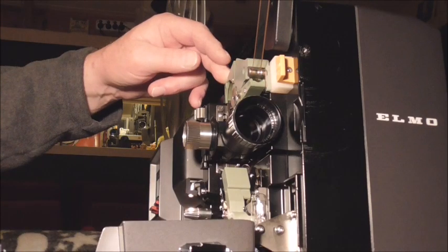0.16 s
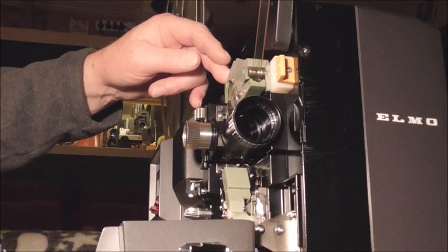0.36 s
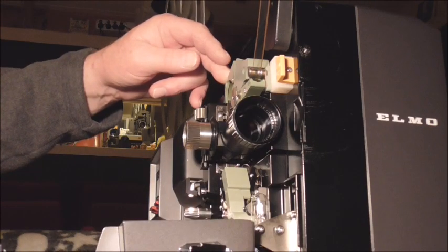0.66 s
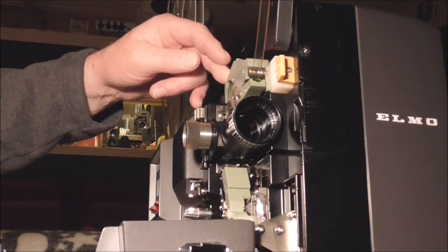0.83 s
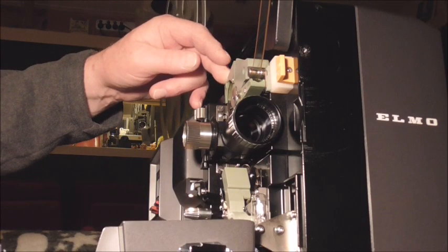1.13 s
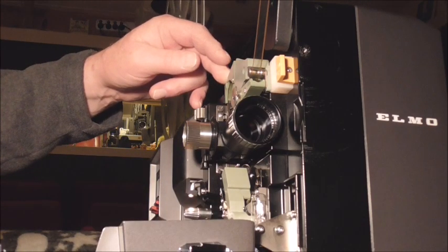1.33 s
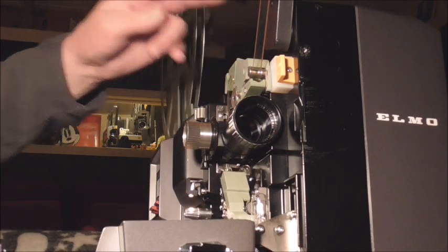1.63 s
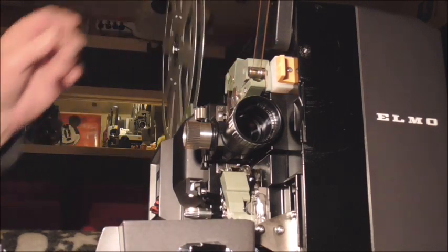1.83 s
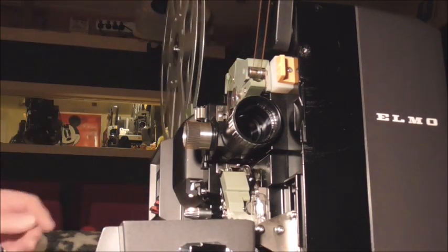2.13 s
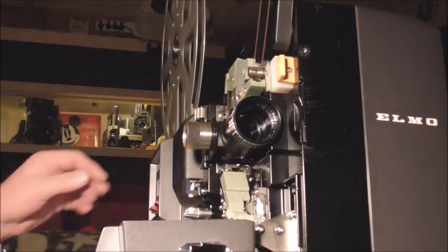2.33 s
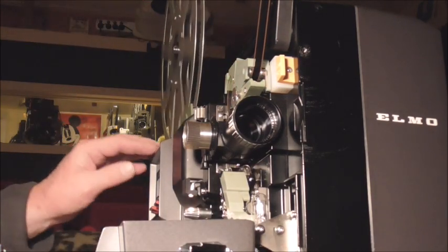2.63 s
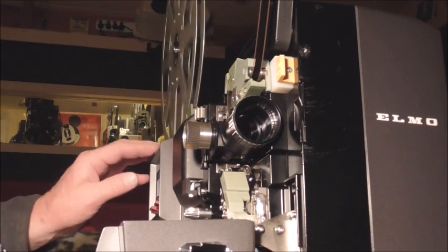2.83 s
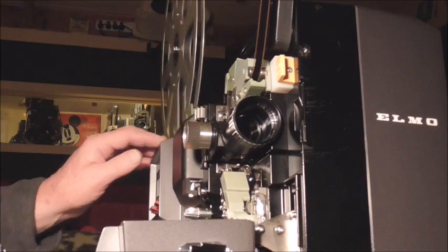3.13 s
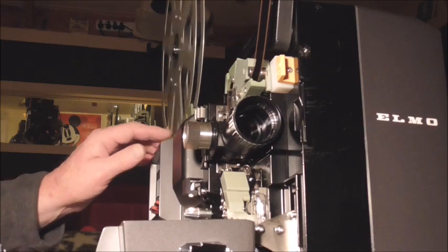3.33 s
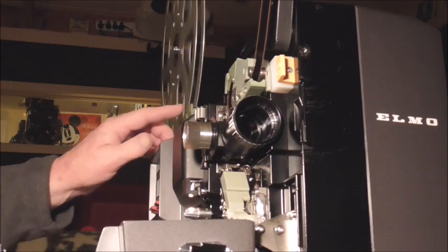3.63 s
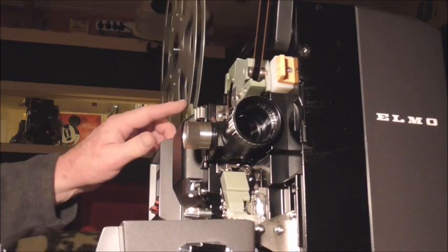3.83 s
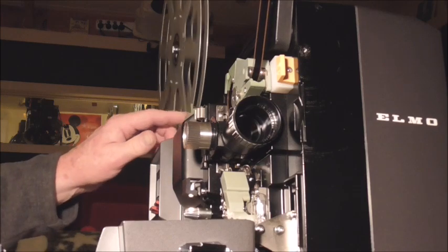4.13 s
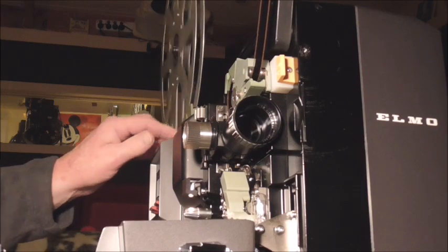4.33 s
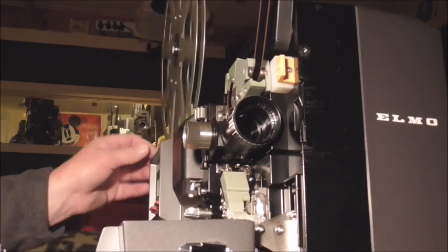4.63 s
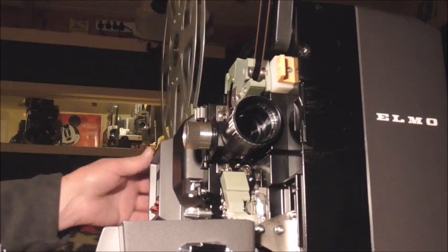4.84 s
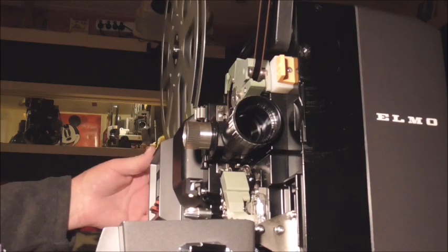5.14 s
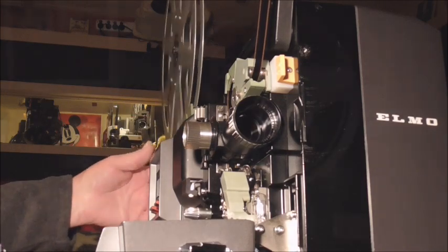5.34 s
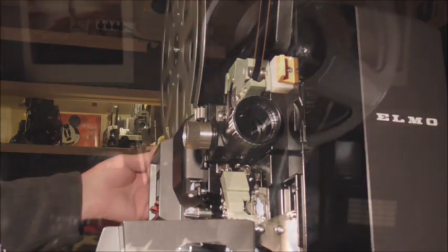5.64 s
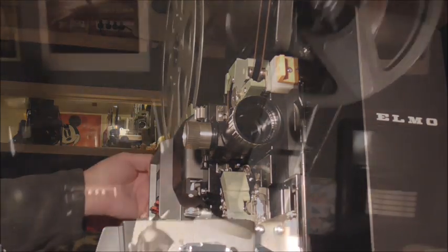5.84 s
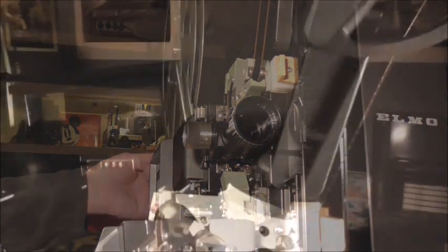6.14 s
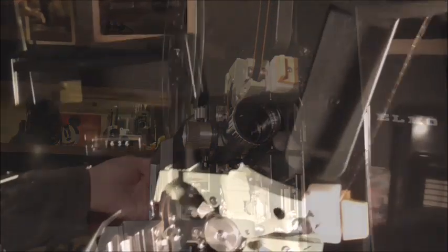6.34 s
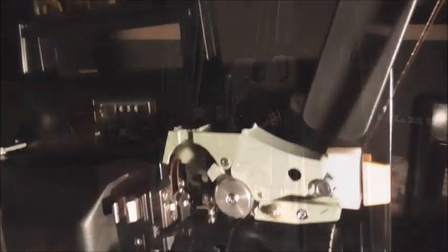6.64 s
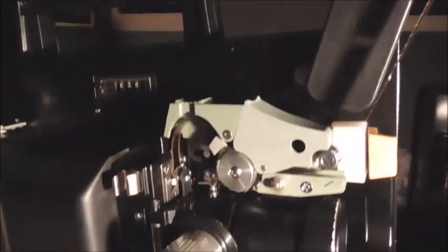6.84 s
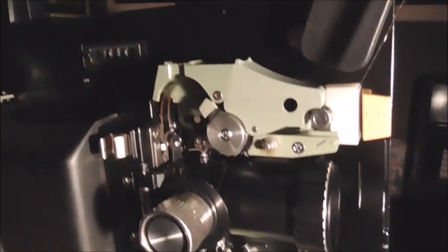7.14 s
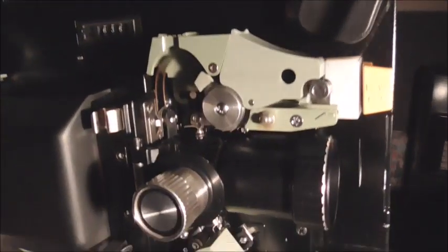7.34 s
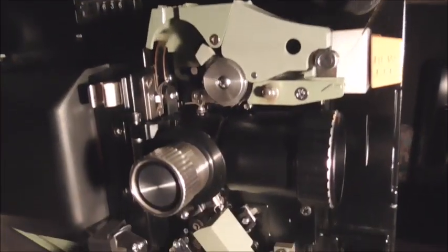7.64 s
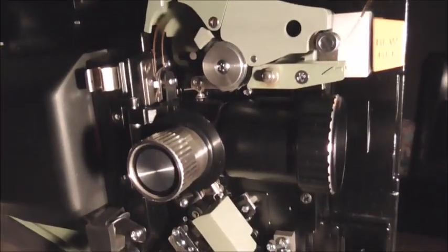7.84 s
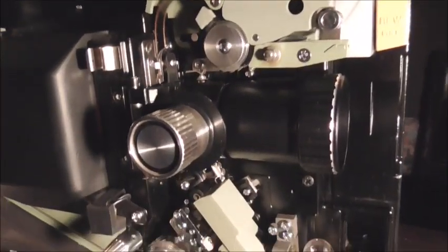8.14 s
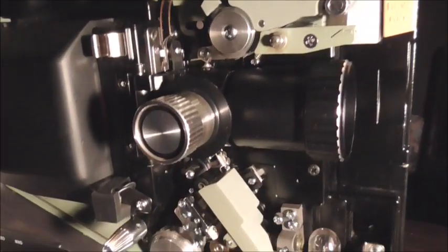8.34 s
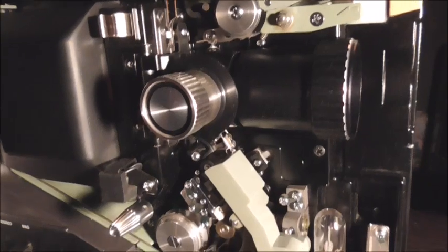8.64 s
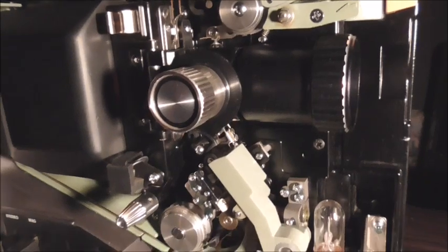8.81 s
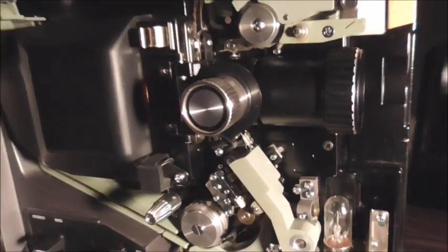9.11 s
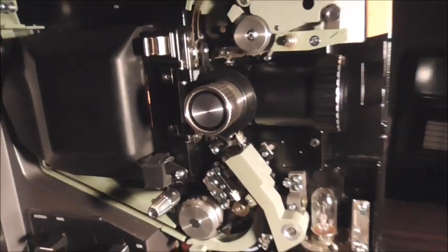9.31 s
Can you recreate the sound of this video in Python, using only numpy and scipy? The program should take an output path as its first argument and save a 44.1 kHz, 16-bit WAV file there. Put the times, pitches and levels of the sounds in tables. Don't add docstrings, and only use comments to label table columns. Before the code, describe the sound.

Steady mechanical purr of a film projector, heard from a step away: sharp rapid ticking, hollow housing ring, gear whine, airy hiss. A quick plastic lever clatter dips the level briefly, after which the ticking recedes. Light handling ticks and a tiny rub follow. From past five seconds closer, fuller hum and crisp metallic ticking take over, rising and falling with the moving microphone, with one small tap and soft rubs.

```python
import sys
import numpy as np
from scipy import signal
from scipy.fft import rfft, irfft
from scipy.io import wavfile

SR = 44100
rng = np.random.default_rng(int(sys.argv[2]) if len(sys.argv) > 2 else 0)


def volts(x):
    e = np.asarray(x, float) / 20
    return 10 ** e


def inscribe(sig):
    pcm = np.round(np.clip(np.atleast_2d(sig).T, -1, 1) * 32767)
    wavfile.write(sys.argv[1], SR, pcm.astype(np.int16))


N = 417627
TIME = np.arange(N) / SR

FRAME_HZ = 24.72
# (time [s], lag [ms])
FAR_LAG = [(0, 11.6), (1.55, 11.15), (1.75, 9.6), (2.2, 10.65), (4.8, 10.95), (6.9, 10.9)]
NEAR_LAG = [(5.3, 25.6), (6.38, 24.65), (7.19, 23.25), (7.6, 22.9), (8.4, 22.68), (9.5, 22.65)]
THREAD_MS = [0, 2.2, 5, 9, 28, 33]
IDLE_MS = [-3, 0, 2.4, 4.4, 13.6, 18.7, 28]
NEAR_MS = [-3.2, 0, 2.3, 4.4, 15.8, 18.8, 21.6]
# (dull part [dB], bright part [dB], top part [dB], dying time [ms])
THREAD_TAPS = [
    (0, 0, 1, 1.5),
    (-8, -2, -5, 1.2),
    (-2, -9, -10, 2.2),
    (-12, -14, -16, 6),
    (-19, -19, -21, 4),
    (-18, -18, -20, 5),
]
IDLE_TAPS = [
    (-15, -19, -19, .7),
    (-2, -1, 1, .9),
    (-3, -8, -8, 1.3),
    (-3, -7, -7, 1.6),
    (-17, -14, -18, .7),
    (-14, -6, -10, .7),
    (-13, -24, -24, 4),
]
NEAR_TAPS = [
    (-14, -22, -13, .8),
    (-4, -5, 0, 1.3),
    (-2, -11, -7, 1.5),
    (-6, -14, -11, 1.8),
    (-15, -21, -14, .8),
    (-13, -15, -8, .9),
    (-15, -23, -15, 1.2),
]
# (frequency [Hz], level [dB per Hz])
THREAD_COLOUR = [(880, -37), (1500, -13), (1620, -44), (2060, -16.5), (2800, -13.5), (3590, -9),
                 (4040, -1.5), (4460, 1.5), (5280, -9), (6310, -6.5), (7920, -15.5), (8920, -8),
                 (9950, -8.5), (14300, -13.5), (16000, -19)]
IDLE_COLOUR = [(1060, -33), (1800, -5.5), (2180, -5), (2590, -9), (3400, -4.5), (4200, 2.5), (5000, 1),
               (5440, -13), (6300, -9), (8700, -5.5), (10000, -3.5), (11500, -8), (14000, -9.5),
               (15800, -15)]
NEAR_COLOUR = [(1060, -40.5), (1800, -10.5), (2050, -5.5), (2370, -11.5), (3350, -10.5), (3670, -13.5),
               (4570, -1.5), (5290, -11.5), (6300, -10.5), (8590, 1), (10300, -3.5), (11700, 0.5),
               (13000, -7), (15300, -9.5), (16000, -36)]
CHIRP_DB, CHIRP_MS, CHIRP_SCATTER_DB = 7, 1.2, 1.9
CHIRP_FADES = 0.94
UPPER_RING, UPPER_RING_DB = 1.33, 17

# (frequency [Hz], t60 [s], blow delay [ms], threading [dB], idling [dB], close [dB])
HOUSING = [(143, 0.2, 1.7, -47, -55, -44), (247.9, 0.47, 4.38, -20, -15, -21.5),
           (326.7, 0.25, 6.24, -14, -9.5, -7.5), (381.5, 0.24, 6.33, -35, -34, -9),
           (494, 0.25, 4.31, -5.5, -5.5, -13), (538.8, 0.16, 7.19, -5.5, 5, -1.5),
           (541.4, 0.52, 4.877, -11.5, -2, -8), (641, 0.47, 5.91, -10, -1.5, -35),
           (670, 0.13, 5.76, -36, -11, 0), (731.3, 0.09, 7.358, 3, 14, 9.5),
           (742, 0.51, 4.975, -23.5, -16.5, -5.5), (790, 0.56, 5.06, -23, -48, -8.5),
           (970.8, 0.16, 4.006, -9.5, -1, -3), (1123, 0.057, 4.325, -8.5, 4, -9),
           (1515, 0.027, 2.81, -2.5, 1, -9.5), (2038, 0.058, 1.4, -5.5, -4.5, -4.5)]
BLOW_SCATTER_DB, BLOW_WANDER_DB = 0.8, 1.8
HOLLOW_HZ, HOLLOW_SHARE = (360, 455), 0.75
GEAR_HZ, MOTOR_HZ = 564.2, 12.8
# (distance from the mesh tone [motor turns], level [dB])
GEAR_SIDES = [(-2, -11), (-1, -2), (0, 1.5), (0.5, -1), (2.5, -10), (4, -4.5)]
# (multiple of the frame rate [1], far [dB under housing], close [dB under housing])
SHAFT_ORDERS = [(4, -34, -41), (5, -34.5, -35), (6, -30, -31), (7, -29, -38), (12, -25.5, -40)]

# (time [s], peak [dB], thud [dB], dying time [ms])
LEVER = [
    (1.6255, -19.5, -22, 4.5),
    (1.636, -19.5, -13, 4.7),
    (1.662, -14, -4.5, 3.7),
    (1.6652, -14, -11, 3.4),
    (1.669, -14, -1.5, 1.8),
    (1.677, -18.5, -10, 3.1),
    (1.6866, -8.5, -12.5, 1.3),
    (1.6886, -13.5, -8, 4.4),
]
# (frequency [Hz], level [dB], t60 [s])
LEVER_MODES = [(446, -2.5, .08), (641, .1, 0.13), (765, -10, 0.13), (873, -12, 0.31), (1096, 1, 0.05),
               (1433, 1, 0.043), (2120, -24, 0.033), (3380, -14, 0.035), (4861, -12, 0.019)]
# (frequency [Hz], level [dB])
LEVER_COLOUR = [(300, -17), (1500, -8), (4500, 1.5), (7000, -3), (10000, 0), (16000, -7)]
TOUCH_COLOUR = [(800, -32), (2500, -52), (4200, -16), (6000, -29), (10000, -1), (16000, -20)]
# (time [s], peak [dB], dying time [ms])
TOUCHES = [
    (3.5364, -51, 2.5),
    (3.9355, -40, 2.5),
    (4.3844, -69, 2.5),
    (4.7441, -34, 2.5),
    (4.9077, -35, 2.3),
    (7.0584, -28, 2.5),
]
# (start [s], end [s], frequency [Hz], level [dB])
SCRAPES = [
    (4.14, 4.25, 5200, -55),
    (8.14, 8.3, 3000, -50),
    (7.45, 7.52, 3000, -52),
]
SQUEAK_S, SQUEAK_LENGTH_S = 4.155, 0.055
SQUEAK_HZ, SQUEAK_DB, SQUEAK_OCTAVE_DB = 5200, -52, -5
# (start [s], end [s], film hiss lift [dB], claw lift [dB])
HANDLING = [
    (3.32, 3.56, 2, -0.5),
    (3.72, 4.1, 3, 0),
    (4.11, 4.325, 5.5, -0.5),
    (4.674, 5.016, 2.5, 3.5),
]
HANDLING_EDGE_S = 0.024

# (frequency [Hz], level [dB per Hz])
NEAR_FAN = [(25, -35), (60, -48.5), (130, -16.5), (220, -18.5), (330, -6.5), (430, -5.5), (555, -7.5),
            (640, -10), (760, 0.5), (860, -8), (1100, -13.5), (1700, -28.5), (2500, -27), (4000, -60.5)]
FAR_FAN = [(25, -30), (60, -39), (130, -26.5), (220, -20.5), (330, -8), (420, -24), (480, -3.5),
           (555, -14.5), (640, -12), (760, -9.5), (860, -13), (1100, -11), (1700, -23.5), (4000, -48.5)]
FAN_DB = (-8, -10, -9.5)
# (frequency [Hz], level [dB per Hz])
FILM_HISS = [(900, -20), (1500, -6), (2100, -10), (2800, -12), (4370, -5), (5000, -7), (5400, -16),
             (6500, -16), (9700, -7), (11500, -12), (13000, -20), (15500, -24)]
FILM_LEFT_DB, FILM_SETTLES_S = 18, 0.17

# (housing [dB], claw [dB], film hiss [dB])
THREADING = (-39.5, -33.5, -48.5)
IDLING = (-37, -50, -57)
CLOSE = (-25, -31.5, -42)
# (time [s], level [dB])
DISSOLVE = [
    (5.34, 4),
    (6.1, 3.5),
    (6.7, 1.5),
    (6.86, -36),
]
DUCK_DB, DUCK_AT_S, RECOVER_S = -7.5, 1.663, 0.18
# (time [s], nearness [dB], top lift [dB], pitch of the claw's ring [Hz])
ROAM = [
    (5.34, -3.5, -11, 8300),
    (5.9, -2, -13, 8750),
    (6.5, 0, -15, 8700),
    (6.75, 0.5, -12, 8830),
    (7.1, -2, -16.5, 8880),
    (7.55, -1, -8, 8650),
    (8.1, .5, -8, 8650),
    (8.4, -1, -11, 8200),
    (8.95, .5, -12, 8620),
    (9.47, -1.5, -6, 8800),
]
CLAW_FOLLOWS, HISS_FOLLOWS = 1.26, 0.7
NODE_DB, NODE_LEFT_S, NODE_EXIT_S, UPPER_HUM_GAINS = -15, 6.0, 0.21, 0.42
# (frequency [Hz], side minus mid [dB])
SIDE_DB = [(40, -3), (110, -5.5), (200, -7.5), (380, -14), (700, -11), (1290, -10.5), (2380, -17.5),
           (4400, -10), (8120, -5.5), (15000, -6.5)]
# (frequency [Hz], left minus right [dB])
BALANCE_DB = [(60, 0.5), (200, -0.8), (380, -0.5), (700, -0.2), (1290, -0.9), (4400, -0.9), (8120, -1),
              (15000, -4)]


def claw_landings(lag):
    whole = np.arange(-2, N / SR * FRAME_HZ) / FRAME_HZ
    return whole + np.interp(whole, *np.transpose(lag)) / 1000


def claw(landed, contacts_ms, taps, points, top_lift_db):
    parts = np.zeros((3, N))
    for ms, (*parts_db, dying_ms) in zip(contacts_ms, taps):
        jitter_s = 0.0001 * rng.standard_normal(len(landed))
        clicks = strikes(landed + ms / 1000 + jitter_s, np.ones(len(landed)))
        parts += volts(np.array(parts_db))[:, None] * dying(clicks, dying_ms)
    grit_db = 0.5 * np.minimum(rng.exponential(1, N), 3)
    impacts = rng.standard_normal((2, N)) * volts(grit_db)
    dull = parts[0] * band(impacts, 1020, 7230)
    bright = parts[1] * band(impacts, 6510, 9730)
    top = volts(top_lift_db) * parts[2] * band(impacts, 10200, 18000)
    return rms_one(colour(dull + bright - top, points))


def chirp(landed):
    near_db, turn_db, ring_hz = in_time(ROAM)
    blows = strikes(landed, volts(CHIRP_SCATTER_DB * rng.standard_normal(len(landed))))
    phase = 2 * np.pi * np.cumsum(ring_hz) / SR
    lower = volts(CHIRP_DB - CHIRP_FADES * turn_db) * np.sin(phase)
    upper = volts(UPPER_RING_DB + turn_db) * np.sin(UPPER_RING * phase)
    envelope = dying(blows, CHIRP_MS) - dying(blows, 0.11)
    return envelope * (lower + upper)


def housing(landed, stage):
    out = np.zeros(N)
    for mode in HOUSING:
        hz, t60, blow_ms = mode[:3]
        wander_db = BLOW_WANDER_DB * np.interp(landed, TIME, drift(1.75))
        scatter_db = BLOW_SCATTER_DB * rng.standard_normal(len(landed))
        strength = volts(mode[3 + stage] + wander_db + scatter_db)
        out += ring(strikes(landed + blow_ms / 1000, strength), hz, t60)
    return rms_one(band(out, 203, 2500))


def gears():
    out = np.zeros(N)
    for turns, db in GEAR_SIDES:
        phase = 2 * np.pi * (GEAR_HZ + turns * MOTOR_HZ) * TIME + rng.uniform(0, 7.1)
        out += volts(db + 1.6 * drift(1.5)) * np.sin(phase + 0.58 * drift(1.85))
    return rms_one(out)


def shaft_hum(close):
    out = np.zeros(N)
    for multiple, far_db, close_db in SHAFT_ORDERS:
        level = volts((close_db if close else far_db) + 1.5 * drift(1.4))
        out += level * np.sin(2 * np.pi * multiple * FRAME_HZ * TIME + rng.uniform(0, 2 * np.pi))
    return out


def projector(lag, levels, contacts_ms, taps, points, stage, gear_db, knock_db):
    body_db, claw_db, hiss_db, top_lift_db, hum_lift_db = levels
    close = stage == 2
    landed = claw_landings(lag)
    tones = volts(knock_db) * housing(landed, stage) + volts(gear_db) * gears() + shaft_hum(close)
    if not close:
        tones = tones - HOLLOW_SHARE * band(tones, *HOLLOW_HZ)
    tones = (tones + (volts(hum_lift_db) - 1) * band(tones, 732, 752)
             + (volts(-UPPER_HUM_GAINS * hum_lift_db) - 1) * band(tones, 784, 805))
    lagging = np.gradient(tones) * SR / (2 * np.pi * 900)
    fan = volts(FAN_DB[stage]) * air(NEAR_FAN if close else FAR_FAN, 0.77)
    body = np.array([tones, lagging]) + fan
    clicks = claw(landed, contacts_ms, taps, points, top_lift_db)
    if close:
        clicks = clicks + chirp(landed) * [[1], [0.35]]
    hiss = air(FILM_HISS, 1.4)
    hiss = hiss + (volts(top_lift_db) - 1) * band(hiss, 11300, 11600)
    return volts(body_db) * body + volts(claw_db) * clicks + volts(hiss_db) * hiss


def idle_levels():
    hiss_lift_db, claw_lift_db = handling()
    settling_db = FILM_LEFT_DB * np.clip(1 - (TIME - LEVER[0][0]) / FILM_SETTLES_S, 0, 1)
    return IDLING[0], IDLING[1] + claw_lift_db, IDLING[2] + hiss_lift_db + settling_db, 0, 0


def close_levels():
    near_db, turn_db, ring_hz = in_time(ROAM)
    node_db = NODE_DB * np.clip((NODE_LEFT_S - TIME) / NODE_EXIT_S, 0, 1)
    claw_db = CLOSE[1] + CLAW_FOLLOWS * near_db
    hiss_db = CLOSE[2] + HISS_FOLLOWS * near_db
    return CLOSE[0] + near_db, claw_db, hiss_db, turn_db, node_db


def handling():
    lifts = np.zeros((2, N))
    for start, end, hiss_db, claw_db in HANDLING:
        held = np.clip(np.minimum(TIME - start, end - TIME) / HANDLING_EDGE_S, 0, 1)
        lifts += held * np.array([[hiss_db], [claw_db]])
    return lifts


def lever():
    seconds, peak_db, thud_db, dying_ms = np.transpose(LEVER)
    crack = sum(dying(strikes([s], [volts(db - 3.5)]), ms) for s, db, ms in zip(seconds, peak_db, dying_ms))
    crack = crack * rng.standard_normal(N)
    thud = np.zeros(N)
    for hz, mode_db, t60 in LEVER_MODES:
        strength = volts(peak_db + thud_db + mode_db - 9.5 + rng.normal(0, 3.1, len(seconds)))
        direction = rng.choice([-1, 1], len(seconds))
        thud += ring(strikes(seconds, strength * direction), hz, t60)
    knock = dying(strikes(seconds, volts(peak_db + thud_db)), 17.7) * rng.standard_normal(N)
    tail = dying(strikes(seconds, volts(peak_db - 25)), 21) * rng.standard_normal(N)
    return colour(crack + tail, LEVER_COLOUR)[0] + thud + band(knock, 430, 1100)


def touches():
    ticks = sum(dying(strikes([s], [volts(db)]), ms) for s, db, ms in TOUCHES)
    return colour(ticks * rng.standard_normal(N), TOUCH_COLOUR)[0]


def scrapes():
    out = np.zeros(N)
    for start, end, hz, db in SCRAPES:
        swell = np.sin(np.pi * np.clip((TIME - start) / (end - start), 0, 1))
        rub = rms_one(band(rng.standard_normal(N), hz * 0.92, hz * 1.1))
        out += volts(db + 2.5 * drift(30)) * swell * rub
    return out


def squeak():
    swell = np.sin(np.pi * np.clip((TIME - SQUEAK_S) / SQUEAK_LENGTH_S, 0, 1))
    tone = rms_one(band(rng.standard_normal(N), SQUEAK_HZ * 0.985, SQUEAK_HZ * 1.015))
    octave = band(tone ** 2, SQUEAK_HZ * 1.8, SQUEAK_HZ * 2.2)
    return volts(SQUEAK_DB) * swell * (tone + volts(SQUEAK_OCTAVE_DB) * octave)


def air(points, patchy_db):
    return rms_one(colour(rng.standard_normal((2, N)), points)) * volts(patchy_db * drift(43))


def room(x):
    echo = rng.standard_normal(5000) * np.exp(-np.arange(5000) / (0.011 * SR))
    return signal.oaconvolve(x, echo / np.sqrt(np.sum(echo ** 2)))[:N]


def strikes(seconds, gains):
    at = np.round(np.asarray(seconds) * SR).astype(int)
    inside = (at >= 0) & (at < N)
    return np.bincount(at[inside], np.asarray(gains)[inside], minlength=N)


def dying(clicks, ms):
    return signal.lfilter([1], [1, -np.exp(-1 / (ms * SR / 1000))], clicks)


def ring(clicks, hz, t60):
    r = volts(-60 / (t60 * SR))
    w = 2 * np.pi * hz / SR
    return signal.lfilter([0, np.sin(w)], [1, -2 * r * np.cos(w), r * r], clicks + 1e-18)


def band(x, low_hz, high_hz):
    return signal.sosfilt(signal.butter(2, [low_hz, high_hz], "band", fs=SR, output="sos"), x)


def colour(x, points):
    hz = np.fft.rfftfreq(4096, 1 / SR) + 1
    table_hz, table_db = np.transpose(points)
    cepstrum = irfft(np.log(volts(np.interp(np.log(hz), np.log(table_hz), table_db))))
    cepstrum[1:2048] *= 2
    cepstrum[2049:] = 0
    response = irfft(np.exp(rfft(cepstrum)))[:3000]
    return signal.oaconvolve(np.atleast_2d(x), response[None], axes=1)[:, :N]


def drift(rate):
    r = np.exp(-80 * np.pi * rate / SR)
    slow = signal.lfilter([1], [1, -2 * r, r * r], rng.standard_normal(N // 40 + 2002))[2000:]
    return np.interp(np.arange(N) / 40, np.arange(len(slow)), rms_one(slow))


def rms_one(x):
    return x / np.sqrt(np.mean(x ** 2) + 1e-20)


def in_time(rows):
    seconds, *columns = np.transpose(rows)
    return [np.interp(TIME, seconds, column) for column in columns]


def scene():
    threader = projector(FAR_LAG, (*THREADING, 0, 0), THREAD_MS, THREAD_TAPS, THREAD_COLOUR,
                         stage=0, gear_db=-5, knock_db=-2.5)
    idler = projector(FAR_LAG, idle_levels(), IDLE_MS, IDLE_TAPS, IDLE_COLOUR,
                      stage=1, gear_db=-6, knock_db=-1.5)
    close = projector(NEAR_LAG, close_levels(), NEAR_MS, NEAR_TAPS, NEAR_COLOUR,
                      stage=2, gear_db=-7.5, knock_db=-1.3)
    threading = np.clip((1.625 - TIME) / 0.01, 0, 1)
    far = threading * threader + (1 - threading) * idler
    far = far * volts(in_time(DISSOLVE)[0]) * (TIME < 6.9)
    duck_s = np.where(TIME > DUCK_AT_S, RECOVER_S, 0.03)
    far = far * volts(DUCK_DB * np.exp(-np.abs(TIME - DUCK_AT_S) / duck_s))
    hand = lever() + touches() + scrapes() + squeak()
    mid, unlike = far + close * (TIME > 5.341) + np.array([hand, room(hand)])
    side = colour(unlike, SIDE_DB)[0]
    left_db = [(hz, db / 2) for hz, db in BALANCE_DB]
    right_db = [(hz, -db / 2) for hz, db in BALANCE_DB]
    return np.vstack([colour(mid + side, left_db), colour(mid - side, right_db)])


def top_cut(x):
    return signal.sosfilt(signal.butter(12, 16970, fs=SR, output="sos"), x)


def record(dry):
    thin = signal.sosfilt(signal.butter(2, 70, "high", fs=SR, output="sos"), dry)
    cut = signal.sosfilt(signal.cheby2(14, 40, 16350, fs=SR, output="sos"), thin)
    return top_cut(cut)


dry = scene()
out = record(dry)
inscribe(out)
```